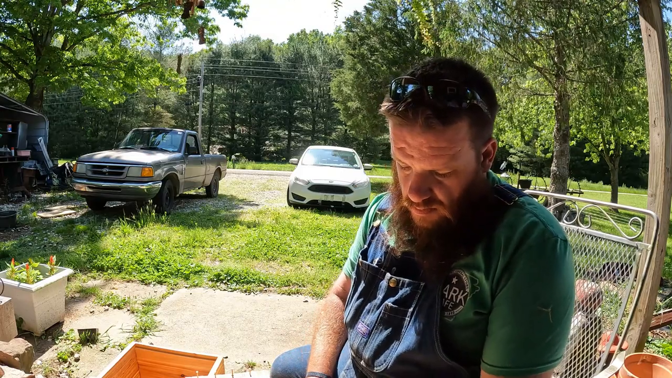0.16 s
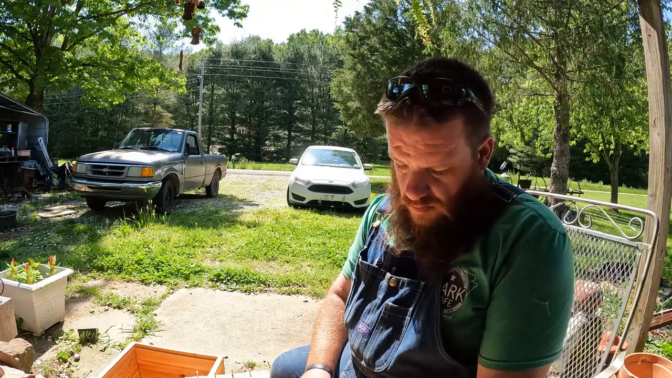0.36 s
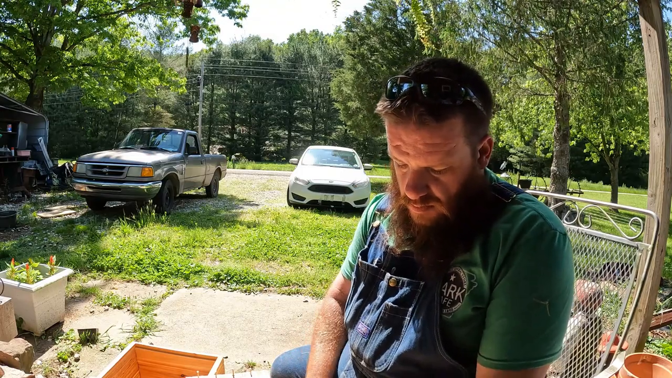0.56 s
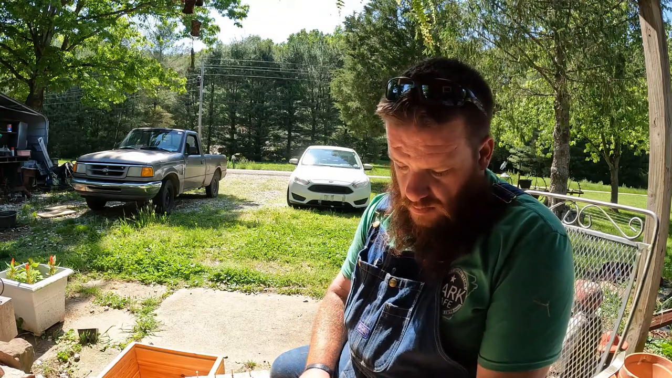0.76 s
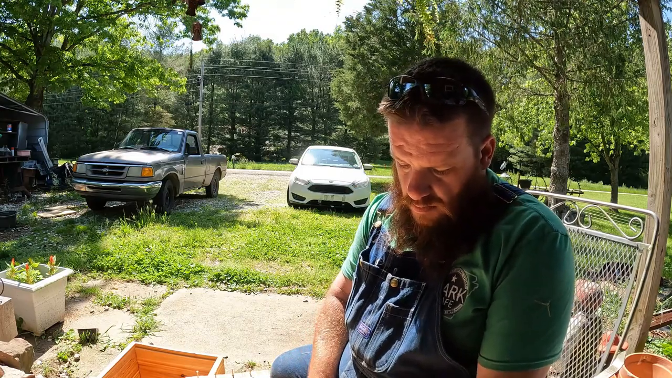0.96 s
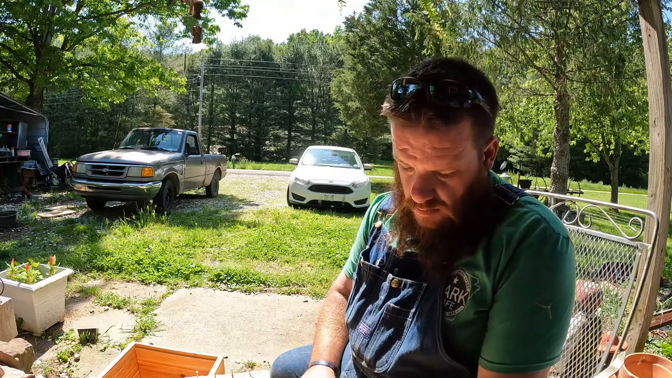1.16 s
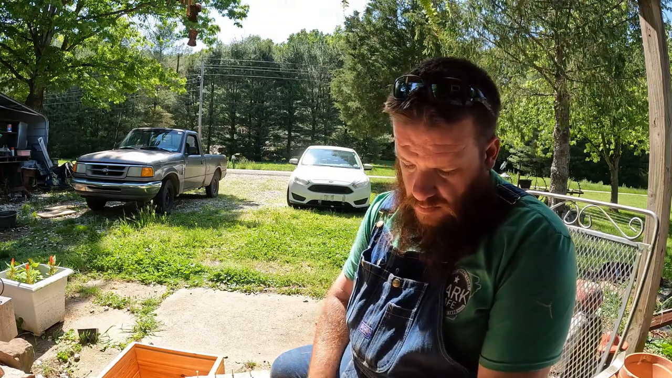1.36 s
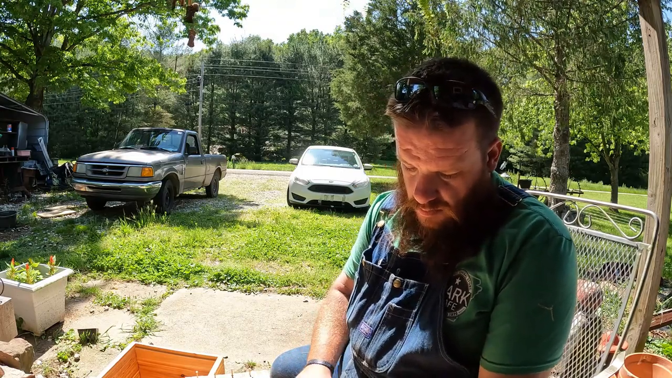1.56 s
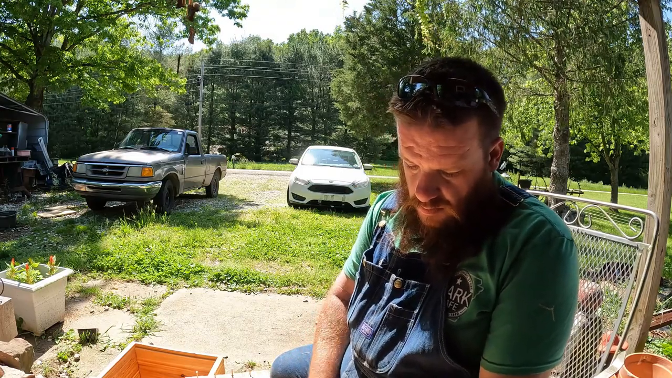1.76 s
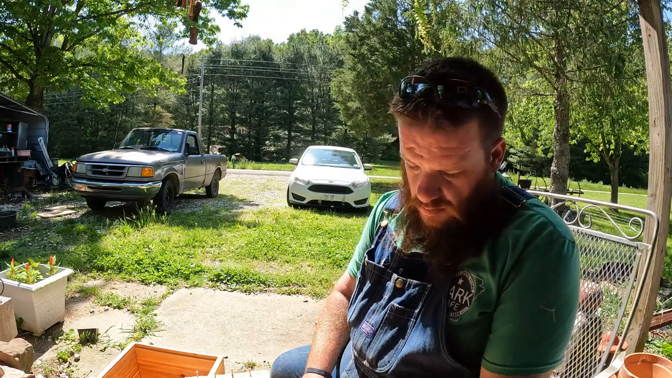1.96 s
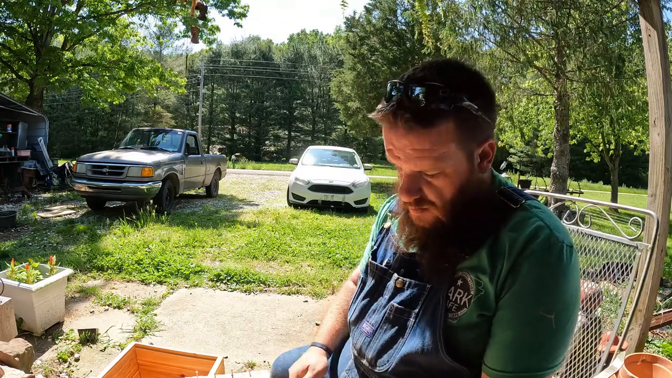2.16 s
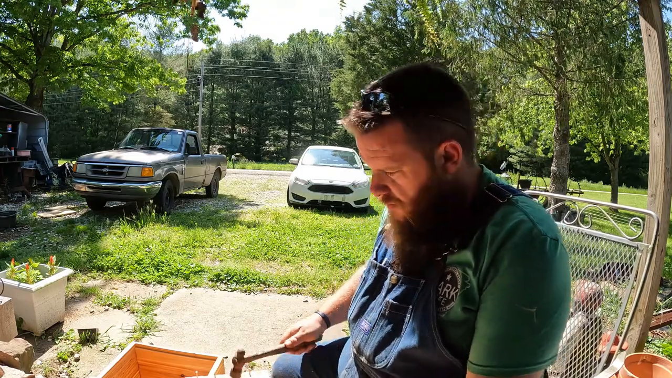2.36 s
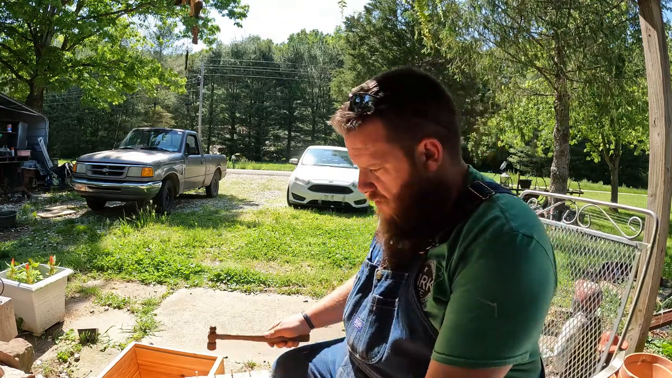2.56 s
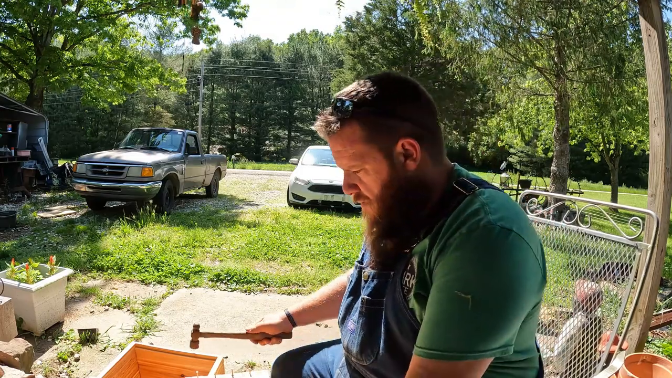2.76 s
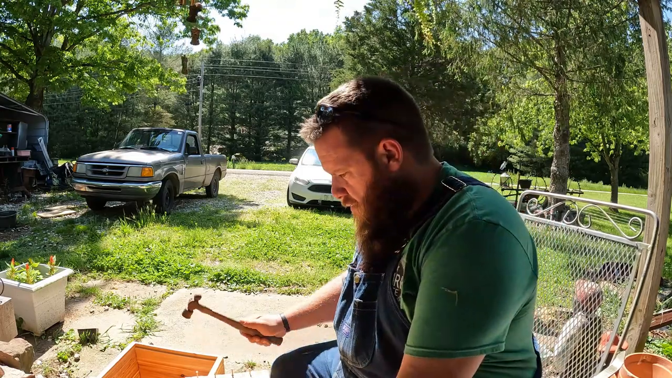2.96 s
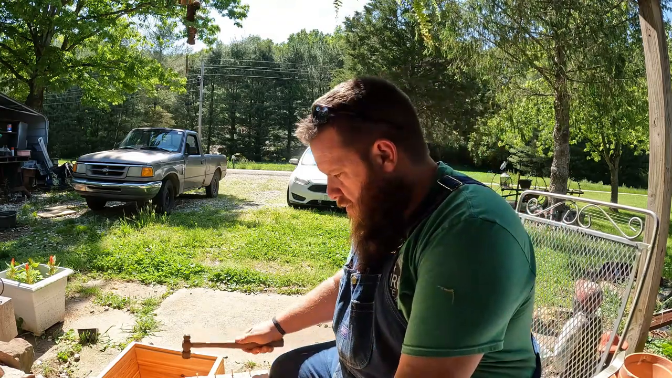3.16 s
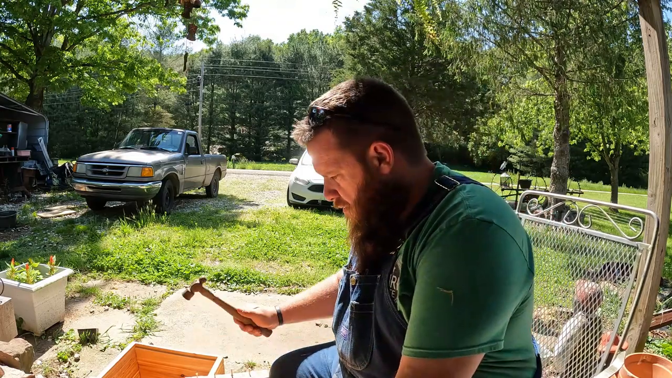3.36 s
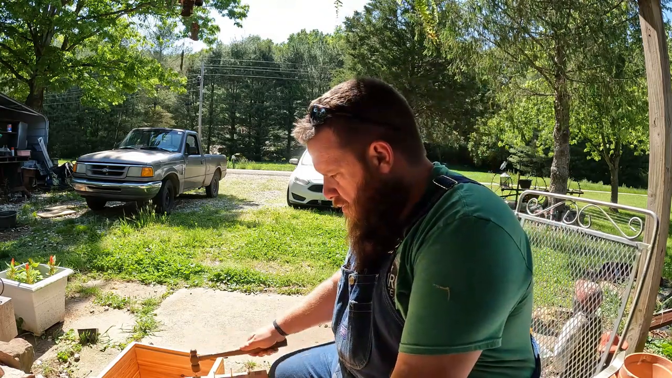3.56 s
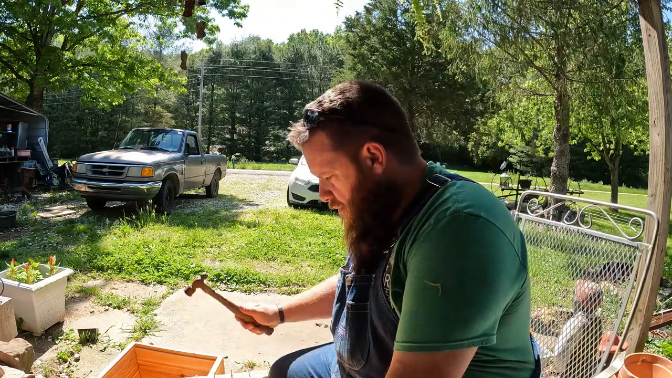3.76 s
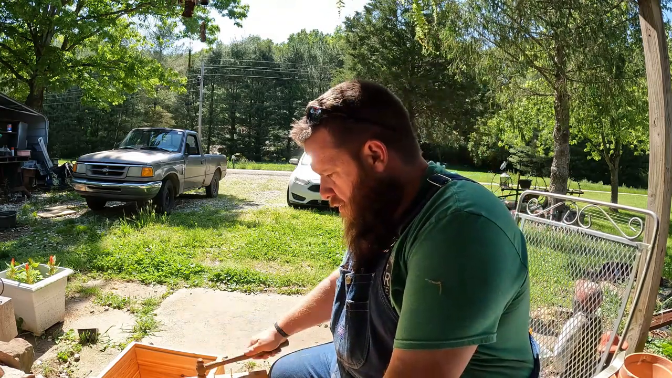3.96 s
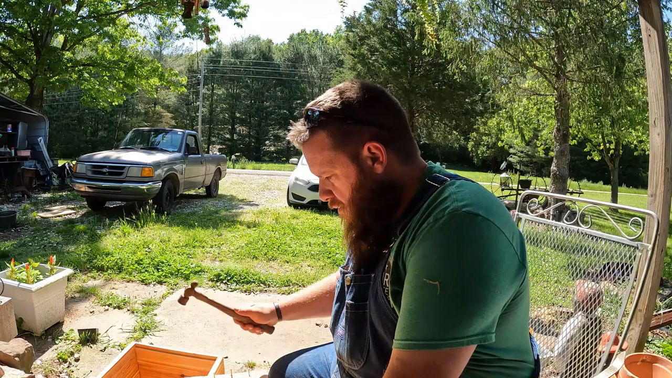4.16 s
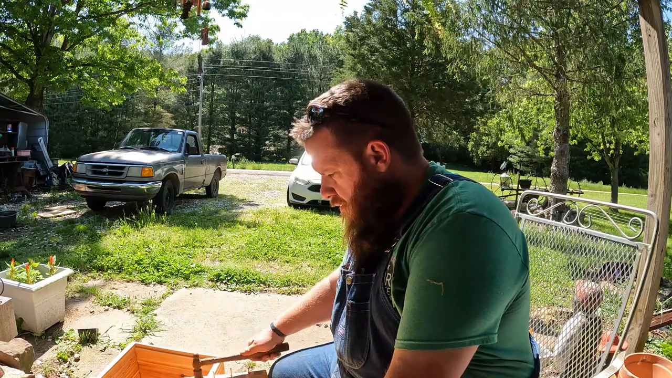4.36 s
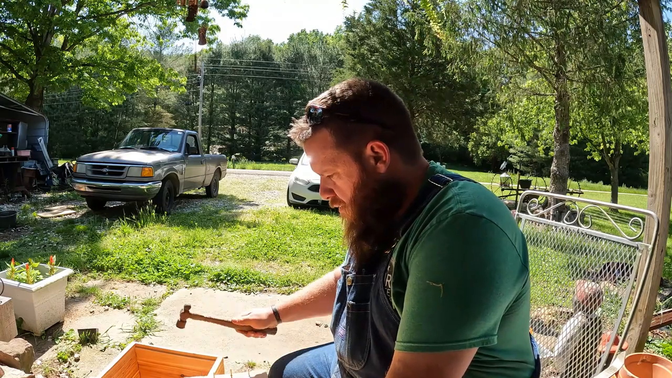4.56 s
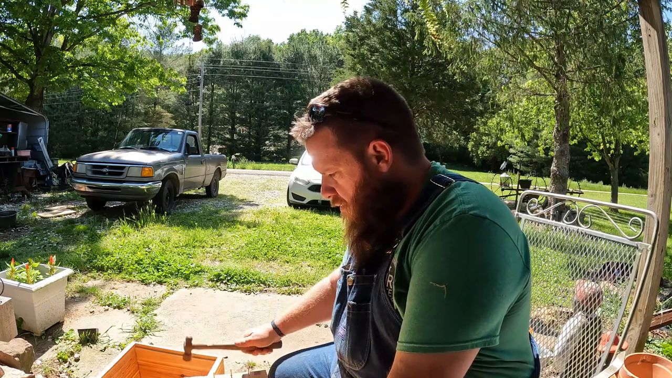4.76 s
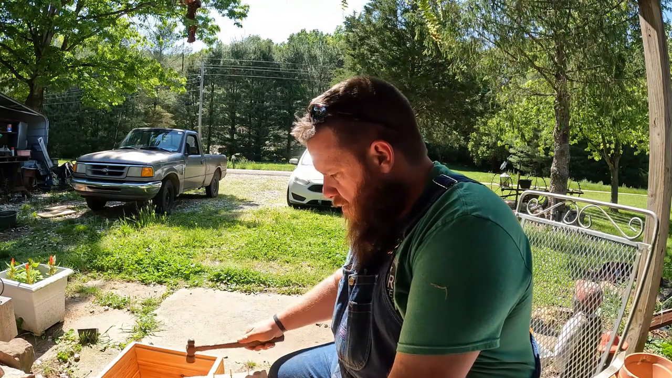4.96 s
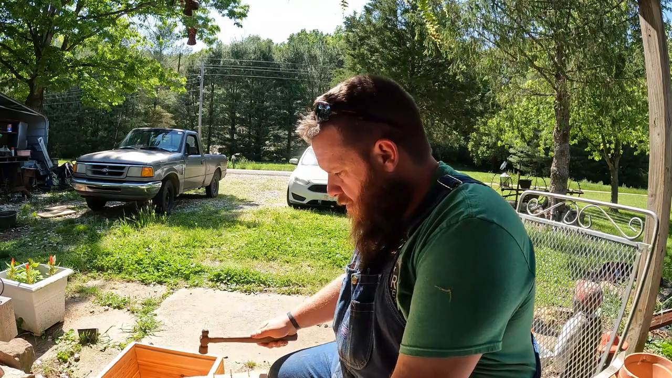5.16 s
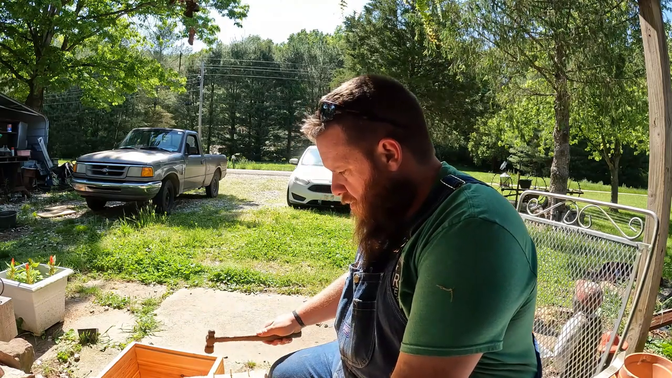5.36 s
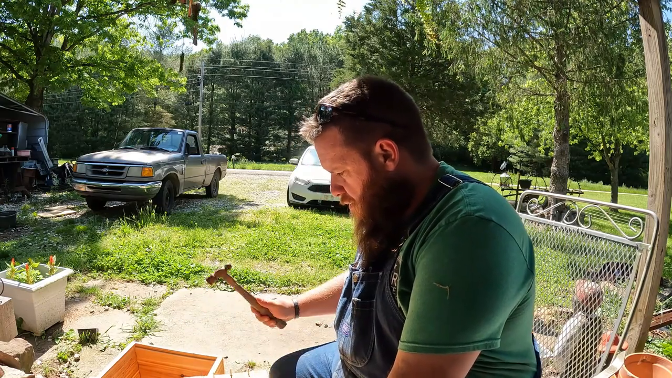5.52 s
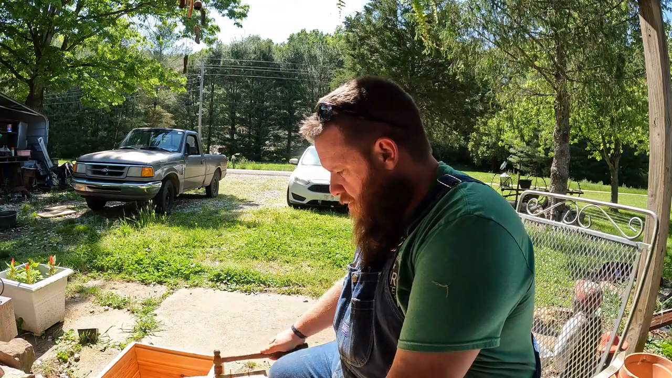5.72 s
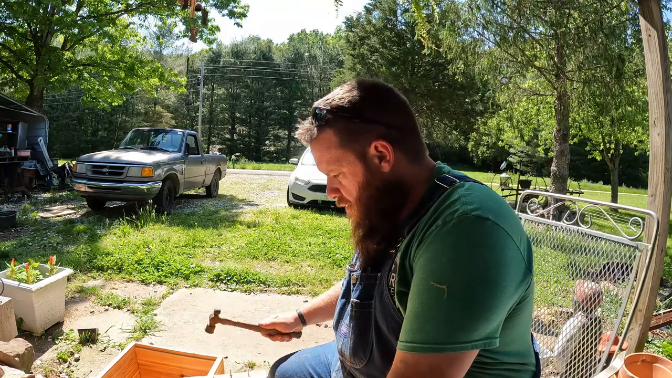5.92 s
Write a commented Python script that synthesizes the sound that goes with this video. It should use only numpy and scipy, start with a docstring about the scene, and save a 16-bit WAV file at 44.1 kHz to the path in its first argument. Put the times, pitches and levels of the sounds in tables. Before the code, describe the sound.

A hammer strikes nails into a hollow wooden box outdoors, sharp cracks with woody boom and yard echo, low wind bumps and faint chimes.

```python
"""Porch: a hammer drives nails into a wooden box; steel cracks on steel, boards boom, the yard echoes.
Blows are decaying modes plus noise bursts; echoes are the near sounds convolved with fading noise bands.
Wind thumps on the microphone as random pulses; a tube chime tinkles as ringing bending modes.
Cloth rustles as grainy noise and birds chirp as faint glides, over flickering bands of distant traffic."""
import sys
import numpy as np
from scipy import signal
from scipy.io import wavfile
from scipy.ndimage import uniform_filter1d

SR = 44100
rng = np.random.default_rng(int(sys.argv[2]) if len(sys.argv) > 2 else 0)


def unload_audio(sound):
    """Save the sound as a 16-bit wav file, at the path given as the first command line argument."""
    columns = np.transpose(np.atleast_2d(sound))
    # keep every value between -1 and 1, then stretch to whole-number steps
    steps = np.round(np.clip(columns, -1, 1) * 32767)
    wavfile.write(sys.argv[1], SR, steps.astype(np.int16))


N = 264159


def undb(db):
    """Amplitude ratio of a level in dB."""
    return 10 ** (np.asarray(db) / 20)


def unit(x):
    """Scale to unit RMS."""
    return x / np.sqrt(np.mean(x ** 2))


def band(x, center_hz, width_hz):
    """Band-pass with edges placed geometrically around the centre."""
    low_hz = np.sqrt(center_hz ** 2 + width_hz ** 2 / 4) - width_hz / 2
    high_hz = min(low_hz + width_hz, SR / 2.1)
    return signal.sosfilt(signal.butter(2, [low_hz, high_hz], "bandpass", fs=SR, output="sos"), x)


def soften(x, cutoff_hz):
    """Gentle low-pass, second order."""
    return signal.lfilter(*signal.butter(2, cutoff_hz, fs=SR), x)


def stereo(mid, side, spread):
    """Left and right from a shared signal plus a side signal of opposite sign."""
    return mid + spread * side * np.array([[1], [-1]])


def ring(hz, db, t60_s, length_s, phase=0.):
    """Exponentially decaying sines, one column per mode."""
    t = np.arange(round(length_s * SR), dtype="float32")[:, None] / SR
    hz, db, t60_s, phase = (np.float32(v) for v in (hz, db, t60_s, phase))
    decay = np.exp((db / 60 - t / t60_s) * np.float32(np.log(1000)))
    return decay * np.sin(np.float32(2 * np.pi) * hz * t + phase)


def add(out, start_s, x, pan_db=0.):
    """Mix a sound in; pan_db is left over right."""
    i = int(start_s * SR)
    x = x[..., :N - i]
    out[:, i:i + x.shape[-1]] += x * undb(np.array([[pan_db], [-pan_db]]) / 2)


def walk(rate_hz, size=N):
    """Random levels of unit RMS, held 1 / rate_hz and slewed twice."""
    hold = int(SR / rate_hz)
    steps = np.repeat(rng.standard_normal(size // hold + 1), hold)
    return unit(uniform_filter1d(uniform_filter1d(steps, hold), hold)[:size])


def curve(table):
    """Interpolate (t/s, value) rows over the whole scene."""
    at_s, values = np.transpose(table)
    return np.interp(np.arange(N) / SR, at_s, values)


def thump(hz):
    """Pressure pulse: a push between two weaker pulls."""
    u = np.linspace(-4, 4, int(2.5 * SR / hz))
    return (1 - u ** 2) * np.exp(-u ** 2 / 2)


def wind():
    """Random eddies of four sizes on the microphone, small ones growing steeply with the gust; loud ones apart."""
    # gust: t/s, level/dB
    gusts = [(0.0, -45.5), (0.38, -51.5), (0.92, -49), (1.07, -48), (1.5, -44), (2.07, -62.5), (2.27, -57),
             (2.74, -61), (2.95, -50.5), (3.39, -51.5), (3.89, -44), (4.14, -53), (4.44, -47.5),
             (4.55, -61.5), (4.79, -44), (4.95, -46), (5.12, -46.5), (5.99, -50.5)]
    # eddy sizes: f/Hz, rate/(1/s), level at calm_db/dB, slope/(dB per dB of gust)
    eddies = [(32, 12, -49.5, 0.98), (65.4, 250, -49.5, 1.0), (133, 58, -58, 2.5), (244, 58, -74, 3)]
    # single loud eddies: t/s, level/dB, f/Hz
    loud_eddies = [(0.065, -33.5, 63.5), (0.199, -45, 87), (0.87, -33, 65), (1.281, -32, 113.4),
                   (1.353, -34.5, 74.4), (3.774, -28, 69.5), (3.904, -20, 101.5), (3.926, -20, 60.5),
                   (3.946, -14, 162), (3.961, -23, 161), (3.977, -19.5, 139), (4.797, -26.5, 195),
                   (5.048, -34, 83.6), (5.115, -30, 60.7), (5.127, -21, 238), (5.171, -33, 216),
                   (5.197, -25, 227), (5.206, -30, 64.6), (5.488, -31.5, 86.2), (5.624, -29, 94)]
    calm_db = -52  # gust level at which the eddies have their listed strength
    eddy_pan_db, loud_pan_db = -2, -8  # the right port faces the wind
    gust_db = curve(gusts)
    out = np.zeros((2, N))
    for hz, rate_hz, db, slope in eddies:
        pulses = []
        for _ in range(2):
            hits = (rng.random(N) < rate_hz / SR) * rng.laplace(size=N)
            pulses.append(unit(signal.fftconvolve(hits, thump(hz), "same")))
        level_db = db + slope * (gust_db - calm_db) + 0.5 * walk(12.0)
        add(out, 0, undb(level_db) * stereo(*pulses, 0.37), eddy_pan_db)
    for start_s, db, hz in loud_eddies:
        add(out, start_s, undb(db) * thump(hz), loud_pan_db)
    return out


def traffic():
    """Distant traffic and leaves: noise bands at half-octave steps that flicker independently, more in the treble."""
    # spectrum shape: f/Hz, relative density/(dB per Hz)
    spectrum = [(71, -30), (120, 2.5), (321, -11.5), (370, -13.5), (684, -14.5), (757, -5), (1490, -16),
                (3380, -27.5), (5190, -47), (6630, -42), (14700, -47.5), (16000, -63.5)]
    # level of the 810 Hz region: t/s, level/dB
    levels = [(0, -62), (.5, -64.5), (2., -64.5), (2.6, -67.5), (3.4, -65.5), (4.5, -63.5), (5.3, -64.5),
              (5.99, -63.5)]
    at_hz, density_db = np.transpose(spectrum)
    out = np.zeros((2, N))
    for hz in 125 * 2 ** np.arange(0, 7.1, .5):
        mid, side = band(rng.standard_normal((2, N)), hz, hz / 3)
        flicker_db = 0.5 * walk(13.0) + 2.5 * (hz > 3900) * walk(3.1)
        level_db = np.interp(np.log(hz), np.log(at_hz), density_db) + flicker_db
        out += undb(level_db) * stereo(mid, side, 0.45)
    return out / np.std(band(out, 810, 1500)) * undb(curve(levels))


def rustles():
    """Cloth, wood and distant twitter: grainy band noise that rises and fades."""
    # start/s, length/s, rise/s, [(centre f/Hz, width/Hz, level/dB)]
    events = [(.2, 0.65, 0.11, [(8200, 2400, -82), (11500, 3000, -95)]),
              (.392, 0.16, 0.0031, [(296, 265, -49.5), (1460, 300, -60), (1370, 1800, -62.5),
              (3300, 950, -63)]), (2.33, 0.76, 0.063, [(3210, 1830, -74), (7450, 3800, -79),
              (11000, 3300, -96.5)]), (2.83, 0.28, 0.067, [(3700, 1200, -72.5)]),
              (4.25, 0.19, 0.046, [(4300, 2400, -69)])]
    out = np.zeros((2, N))
    for start_s, length_s, rise_s, bands in events:
        u = np.linspace(0, 1, int(length_s * SR))
        envelope = np.minimum(u * length_s / rise_s, 1) * (1 - u ** 2)
        for hz, width_hz, db in bands:
            grains = rng.standard_normal(SR) * undb(2.5 * walk(56.0, size=SR))
            grains = unit(band(band(grains, hz, width_hz), hz, width_hz))[:len(u)]
            add(out, start_s, undb(db) * grains * envelope)
    return out


def steel_and_rattle(t, crack_db, sizzle_db, tail_db, rattle_db):
    """Steel on steel: short modes with noise bursts, boards that chatter, treble that hisses on."""
    # head and nail modes: f/crack pitch, level/dB
    steel = [(1, 0.5), (1.602, -3.5), (2.398, -14.5), (3.5, -20.5)]
    crack_hz, crack_scatter = 2430, 0.016
    tail_hz, tail_s = 8700, 0.028
    blow = np.zeros((2, SR // 2))
    multiple, steel_db = np.transpose(steel)
    pitch_hz = crack_hz * (1 + crack_scatter * rng.standard_normal())
    crack = ring(pitch_hz * multiple, steel_db, 0.0018, len(t) / SR).sum(axis=1)
    noise = rng.standard_normal((5, len(t)))
    rattle = undb(rattle_db + 1.9 * walk(250, size=len(t))) * (1 - np.exp(-t / 0.009)) * np.exp(-t / 0.019)
    burst = (1 - np.exp(-t / 0.00022)) * np.exp(-t / 0.0028)

    chatter = rattle * unit(band(noise[4], 1200, 2200))
    add(blow, 0, undb(crack_db + 13.0) * chatter, 1.5)

    crack_noise = band(stereo(noise[0], noise[2], 0.33), 2300, 2800)
    crack = 3.2 * crack + 3.7 * (burst + 0.84 * rattle) * crack_noise
    add(blow, 0, undb(crack_db) * soften(crack, 8700), 2.2)

    sizzle_noise = band(band(stereo(noise[1], noise[3], 0.33), 7400, 4400), 7000, 11000)
    sizzle = 2.5 * (burst + 3.1 * rattle * np.exp(-t / .03)) * sizzle_noise
    add(blow, 0, undb(sizzle_db) * sizzle, 5.)

    tail = (1 - np.exp(-t / .004)) * np.exp(-t / tail_s) * undb(2.5 * walk(200, size=len(t)))
    tail_noise = band(stereo(noise[2], noise[4], 0.33), tail_hz, 8100)
    add(blow, 0, undb(tail_db) * 3.1 * tail * tail_noise, 4.)
    return blow


def box(t, box_db, belly_db, panel_db, lid_db, clack_db, sunk):
    """Box modes, low ones swelling late; the deeper the nail, the more the boards knock and the slower they swell."""
    # f/Hz, level/dB, t60/s
    modes = [(161.4, 8.5, 0.25), (181.4, 6, 0.24), (213.74, 6, 0.27), (246, 6.5, 0.11), (271, 6, 0.11),
             (292, 10, 0.12), (339, 5.5, 0.12), (400.6, 3.5, 0.1), (453, -7, 0.19), (480, -5, 0.14),
             (523, -2, 0.1), (702.8, 0, 0.17), (760.6, 8.5, 0.07), (803.4, 2.5, 0.11), (967, 3.5, 0.047),
             (1037, 1.5, 0.07), (1266, 1, 0.021), (1324, -2, 0.024), (1467, -7, 0.053), (1586, -9.5, 0.015),
             (1690, -6.5, 0.0047), (1890, -2, 0.0096), (2060, -8, 0.011), (2300, -8.5, 0.021),
             (2740, -13.5, 0.024)]
    # corners of the level contour: hollow boom, belly, panel, knock, lid, clack; f/Hz
    zones_hz = [172, 213, 270, 770, 1040, 1700]
    spot_scatter_db = 1.5  # no two blows land on quite the same spot
    slap_db, slap_ms = 8, 6  # the first swings stand out, then settle
    knock_db = -10 + 18.5 * sunk  # against the hollow boom
    swell_ms = 2.1 + 1.3 * sunk  # of a 200 Hz mode
    hz, db, t60_s = np.transpose(modes)
    detune, spot, phase, aim = rng.standard_normal((len(hz), 4)).T
    contour_db = [0, belly_db, panel_db, knock_db, knock_db + lid_db, clack_db]
    zone_db = np.interp(np.log(hz), np.log(zones_hz), contour_db)
    mode_db = box_db + db - 6.5 + spot_scatter_db * spot + zone_db
    swell = 1 - np.exp(-t[:, None] * 1000 / swell_ms * (hz / 200))
    struck = swell * ring(hz * (1 + .02 * detune), mode_db, t60_s, len(t) / SR, 1.285 * phase)
    # the blow sets the energy, however the modes line up
    for part in (hz < 330, (hz >= 330) & (hz < 900), hz >= 900):
        mode_energy = np.sum(struck[:, part] ** 2)
        struck[:, part] *= np.sqrt(mode_energy / np.sum(struck[:, part].sum(axis=1) ** 2))
    slap = undb(slap_db * sunk * np.exp(-t * 1000 / slap_ms))
    rough = 1 + 0.34 * walk(300, size=len(t))  # loose joints
    lean = .03 + 0.1 * aim * np.sqrt(hz / 1000)  # every mode beams its own way
    return soften(slap * rough * np.array([struck @ (1 + lean), struck @ (1 - lean)]), 4200)


def hammer():
    """Each blow: faint early copies of the onset, steel crack, rattle as the nail slides, box, push into the bench."""
    # t/s, box/dB, then against the box: belly/dB, panel/dB, lid/dB, edge clack/dB;
    # crack/dB, sizzle/dB, treble tail/dB, nail sunk/(0-1), rattle against the crack/dB,
    # box answer delay/ms, early copy against the blow/dB;
    # faint rows are a touch, two rebounds and a faint bright click just ahead of the last blow
    blows = [(0.396, -55, 3.5, 3, 2.5, 19.5, -75.5, -81.5, -96, 0.46, -23, .1, -38.5),
             (0.6301, -16, -0.5, -6, 0, 7, -22.5, -25, -46, 0.27, -12, 2.5, -20),
             (0.6934, -30.5, -2, 0.5, -6.5, -5.5, -47, -65, -72, 0.74, -18, 1.2, -38.5),
             (1.042, -18, -1.5, -4, 1.5, 6, -18, -27.5, -48.5, 0.59, -13.5, 1.2, -22.5),
             (1.4463, -23, 6.5, 2, 1, 11, -17, -28.5, -59.5, 1, -20.5, 3.4, -19),
             (1.8581, -16.5, -1, 2.5, 2.5, 10.5, -21.5, -34, -64, 0.8, -24.5, .6, -16.5),
             (3.1405, -22, 8.5, -0.5, -3, 17, -17, -28.5, -48, 0.51, -17.5, 2.2, -18),
             (3.5846, -16.5, -3, -5, 2.5, 21.5, -12.5, -28, -58.5, 0.19, -27, .8, -15.5),
             (4.0103, -16, -1, -4, 4, 10.5, -15.5, -30.5, -55.5, 0.52, -18, 1.5, -19),
             (4.0832, -39.5, 0, 0, 4, 4, -42, -66, -75.5, 1, -13, .1, -36),
             (4.4528, -18.5, -0.5, 2, 5, 15.5, -15, -30.5, -65, 0.67, -34, .6, -12.5),
             (4.8801, -17.5, -1.5, -2, 5, 8.5, -21, -43.5, -68, 0.67, -29, .4, -17.5),
             (5.802, -37.5, 6, 6, 3, 8, -28.5, -24, -78, 0.17, -30, .1, -24),
             (5.807, -23, 1, 0, 4, 16.5, -24, -38, -74, 0.88, -31, .4, -18)]
    thud_hz, thud_db = 110, -10  # the bench under the box takes the push; level against the box
    # the onset is heard faintly this much early, duller and softer; fainter twice as early
    early_ms, early_step_db, early_cutoff_hz, early_rise_ms = 10.7, -11, 6070, 0.9
    out = np.zeros((2, N))
    t = np.arange(SR // 3) / SR
    for (start_s, box_db, belly_db, panel_db, lid_db, clack_db, crack_db, sizzle_db, tail_db,
         sunk, rattle_db, answer_ms, early_db) in blows:
        add(out, start_s, undb(box_db + thud_db) * thump(thud_hz))
        blow = steel_and_rattle(t, crack_db, sizzle_db, tail_db, rattle_db)
        add(blow, answer_ms / 1000, box(t, box_db, belly_db, panel_db, lid_db, clack_db, sunk))
        add(out, start_s, blow[:, :len(t) + 400])
        lead = t[:int(early_ms / 1000 * SR)]
        onset = soften(blow[:, :len(lead)], early_cutoff_hz) * (1 - np.exp(-lead * 1000 / early_rise_ms))
        add(out, start_s - early_ms / 1000, undb(early_db) * onset)
        add(out, start_s - 2 * early_ms / 1000, undb(early_db + early_step_db) * onset)
    return out


def echo(near):
    """Scattered reflections: noise bands fading in two slopes, partly unlike left and right."""
    # porch first, then the yard: f/Hz, early level/dB, early t60/s, late level/dB, late t60/s
    reflections = [(173, -57.5, 0.71, -66, 0.66), (343, -39, 0.21, -58.5, 0.9), (750, -37.5, 0.25, -64, 1),
                   (1310, -41, 0.26, -62, 1), (2970, -51, 0.27, -58, 0.91), (4600, -50, 0.21, -61.5, 0.6),
                   (6900, -48.5, 0.3, -56.5, 0.69), (11500, -47, 0.096, -66.5, 0.28)]
    shift_s = .2  # the noise tails are reshuffled this often, so no fixed colour stands out
    t, bands, fades = np.arange(SR * 3 // 4) / SR, [], []
    for hz, early_db, early_t60_s, late_db, late_t60_s in reflections:
        mid, side = band(rng.standard_normal((2, len(t))), hz, 0.6 * hz)
        bands.append(stereo(mid, side, .4))
        early = undb(early_db - 60 * t / early_t60_s)
        late = undb(late_db - 60 * t / late_t60_s) * (1 - np.exp(-t / 0.0034))
        fades.append((early + late) * (t > .004))
    out, hop, mono = np.zeros((2, N)), int(shift_s * SR), near.mean(axis=0)
    for i in range(0, N - hop, hop):
        rolled = np.roll(bands, rng.integers(len(t)), axis=2)
        tail = np.einsum("bct,bt->ct", rolled, fades)
        piece = mono[i:i + 2 * hop]
        piece = piece * np.hanning(2 * hop)[:len(piece)]  # overlapping cross-fades
        add(out, (i + .5) / SR, signal.fftconvolve(piece[None], tail, axes=1))
    return out


def chime():
    """The clapper scrapes a tube; a sharper touch favours its upper modes; every ring wavers a little."""
    # bending modes of each tube: f/Hz, level/dB, t60/s
    tubes = {"long": [(937, -22, 1.), (2525, -2.5, 1.6), (4791, 4.5, 0.29), (7620, -8, .22)],
             "middle": [(1087, -0.5, 1.5), (2918, -6, 2.5), (5523, -1, 0.25), (8586, -25, .4)],
             "short": [(1265, -12.5, .6), (3400, 6.5, .8), (6325, 0, 0.2), (10900, -26.5, .5)],
             "longest": [(2150, -6, .8)], "far": [(2085, 0, .8)], "far high": [(2750, 0, .6)]}
    # close pair of modes that flutters: f/Hz, level/dB, t60/s
    flutter_pair = [(6099, 1, .9), (6153, 1, 1.)]
    # higher flexes of the tube walls: f/Hz, level/dB, t60/s
    wall_modes = [(7865, 4.5, 0.15), (10024, -10, .3), (12290, -8, .45)]
    # t/s, tube, level/dB, brightness/(dB per octave), flutter/dB, wall/dB, touch/dB
    strikes = [(0.736, "long", -52, 4, -72.5, -75, -67.5), (.8, "longest", -62, -1, -100, -100, -100),
               (0.848, "long", -59.5, -3.5, -67.5, -70, -64), (1.152, "long", -66.5, 12, -80, -87.5, -83),
               (1.683, "long", -56.5, 8, -64, -65, -57.5), (1.7, "longest", -66, -5, -100, -100, -69.5),
               (1.734, "short", -44, -0.5, -86, -85, -63.5), (2.102, "far high", -64, 4, -100, -100, -100),
               (2.26, "far", -68, -2.5, -100, -100, -100), (2.707, "middle", -55.5, 2.5, -65, -84.5, -57.5),
               (2.74, "longest", -73, -9, -100, -100, -100), (3.221, "long", -48, 8.5, -68, -64, -53.5),
               (3.321, "long", -53, -5, -70.5, -63, -58), (3.317, "longest", -52.5, -2.5, -86, -88, -85),
               (3.435, "long", -57, 6, -70, -63, -59.5), (4.12, "middle", -66, 2, -90.5, -92.5, -90),
               (4.7, "long", -86, 12.5, -93, -95.5, -98.5), (5.189, "long", -80.5, 16, -89, -82, -76),
               (5.872, "short", -57.5, -14, -85, -87, -78)]
    out = np.zeros((2, N))
    t = np.arange(SR // 5) / SR
    for start_s, tube, level_db, bright_db, flutter_db, wall_db, touch_db in strikes:
        hz, db, t60_s = np.transpose(tubes[tube])
        modes = [(hz, level_db + db + bright_db * np.log2(hz / 3500), t60_s)]
        for table, gain_db in ((flutter_pair, flutter_db), (wall_modes, wall_db)):
            hz, db, t60_s = np.transpose(table)
            modes.append((hz, db + gain_db, t60_s))
        tone = ring(*np.hstack(modes), 1.3).sum(axis=1)
        add(out, start_s, tone * undb(0.71 * walk(40, size=len(tone))), 1.5)
        click, scrape = rng.standard_normal((2, len(t)))
        click = 1.2 * band(click, 5000, 7000) * np.exp(-t / .003)
        scrape = band(scrape, 14000, 3500) * np.exp(-t / .022) * undb(3 * walk(150, size=len(t)))
        add(out, start_s, undb(touch_db) * (click + scrape), 1.5)
    return out


def chirps():
    """Far birds: gliding tones blurred by leaves, each with a short noise-tail echo from the trees."""
    # start/s, length/s, from f/Hz, to f/Hz, level/dB
    calls = [(1.613, 0.06, 3500, 3770, -66), (2.498, 0.083, 3240, 3215, -73.5),
             (2.832, 0.053, 3900, 3350, -70), (2.87, .04, 3320, 3400, -71.5),
             (2.894, 0.07, 3480, 4050, -67.5), (2.983, 0.056, 3245, 3540, -69.5),
             (3.004, 0.037, 4330, 4200, -76.5), (4.238, 0.043, 3260, 5300, -73),
             (4.272, 0.019, 5470, 5470, -68.5), (4.277, 0.02, 3590, 3400, -62.5),
             (4.342, 0.038, 3280, 3420, -69), (4.295, 0.036, 4170, 4390, -67),
             (4.33, 0.032, 5500, 5870, -73), (4.356, .03, 3630, 4650, -67.5), (4.377, .04, 4810, 4850, -74),
             (4.626, 0.064, 2750, 3190, -61), (4.68, 0.028, 2570, 2610, -66),
             (4.695, 0.039, 3030, 3130, -64), (5.099, 0.028, 4100, 3880, -74),
             (5.14, 0.033, 3510, 3410, -74)]
    trees_db, trees_s = -27.5, .03  # tree echo: noise level, time constant
    out = np.zeros((2, N))
    t = np.arange(SR // 4) / SR
    for start_s, length_s, from_hz, to_hz, db in calls:
        u = np.linspace(0, 1, int(length_s * SR))
        glide_hz = from_hz + (to_hz - from_hz) * np.sin(u * np.pi / 2)
        tone = np.exp(2j * np.pi * np.cumsum(glide_hz) / SR)
        blur = 1 + .9 * (walk(600, size=len(u)) + 1j * walk(600, size=len(u)))
        call = undb(db + 2.7 * walk(120, size=len(u))) * np.real(tone * blur) * np.sin(np.pi * u)
        trees = undb(trees_db) * rng.standard_normal((2, len(t))) * np.exp(-t / trees_s)
        add(out, start_s, call)
        add(out, start_s, signal.fftconvolve(call[None], trees, axes=1))
    return out


def scene():
    """Hammer and chime with their echo, plus wind, traffic, rustles and birds."""
    near = hammer() + chime()
    return wind() + traffic() + rustles() + near + echo(near) + chirps()


def record(dry):
    """The loudest peaks are rounded near full scale; the top is cut."""
    ceiling, top_hz = .93, 16300
    rounded = dry / (1 + (dry / ceiling) ** 8) ** (1 / 8)
    return signal.sosfilt(signal.ellip(8, .2, 80, top_hz, fs=SR, output="sos"), rounded)


dry = scene()
out = record(dry)
unload_audio(out)
```